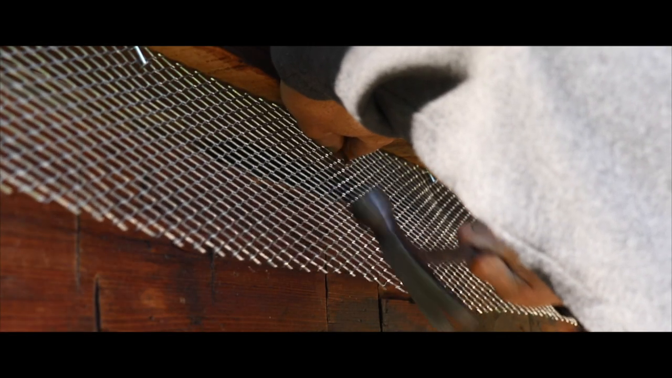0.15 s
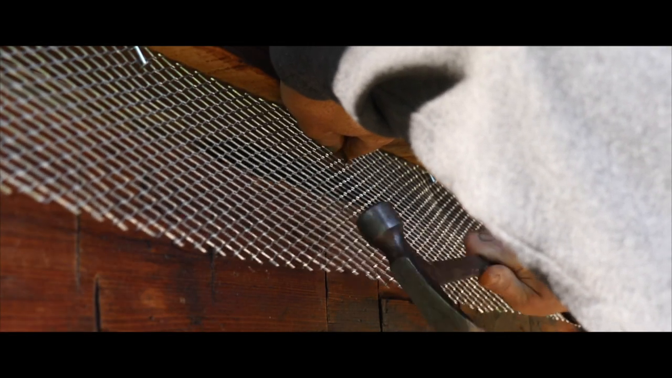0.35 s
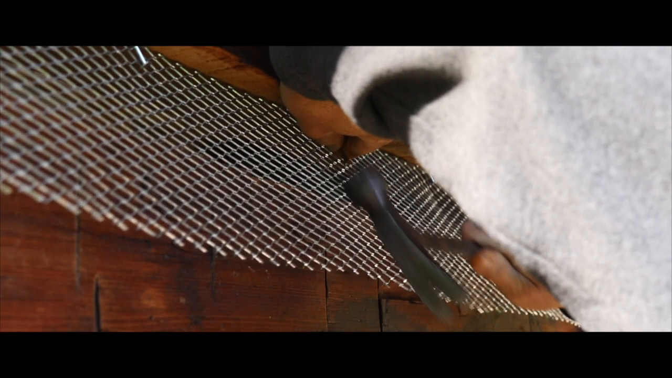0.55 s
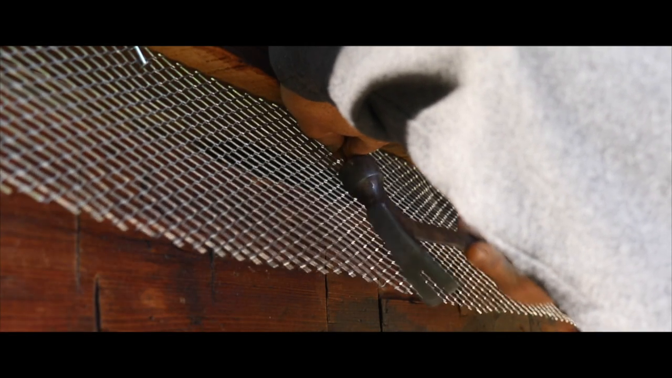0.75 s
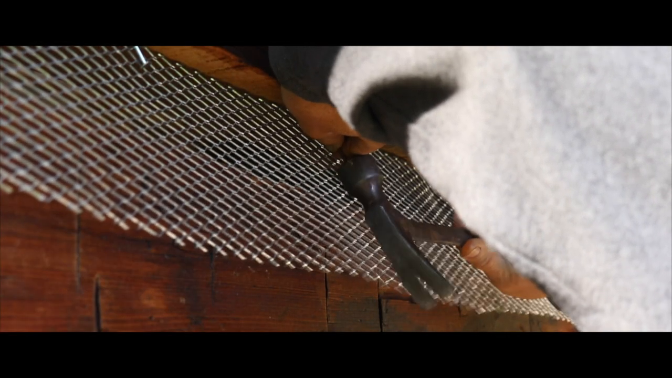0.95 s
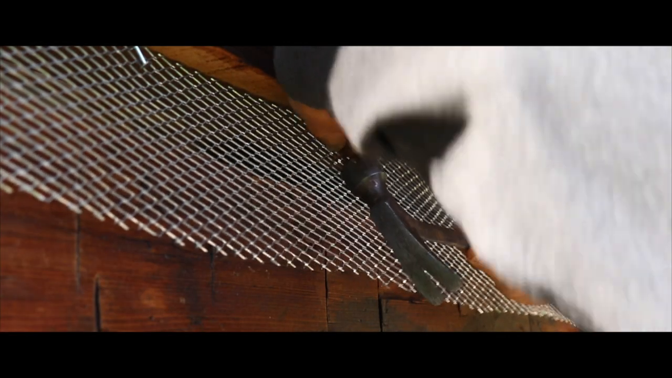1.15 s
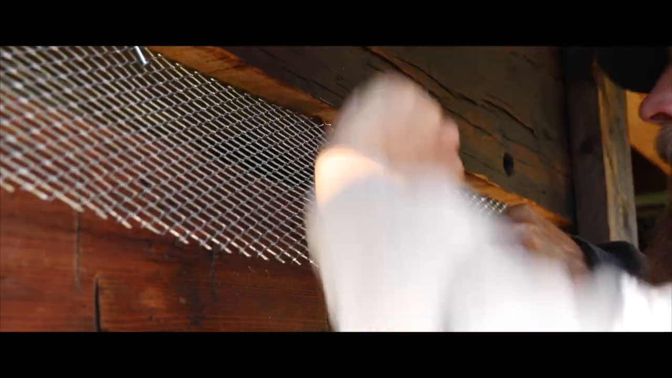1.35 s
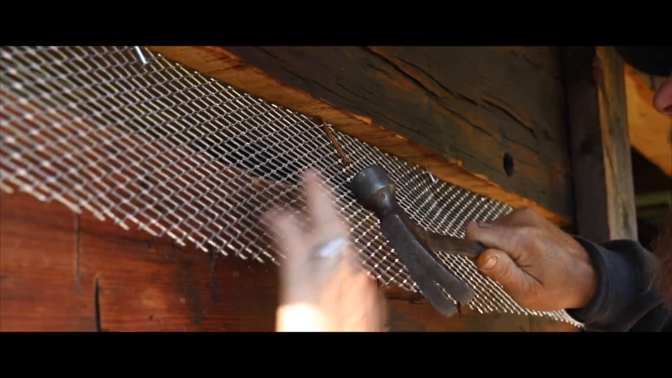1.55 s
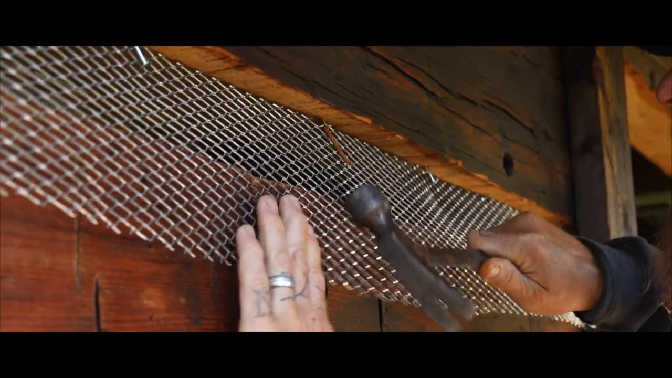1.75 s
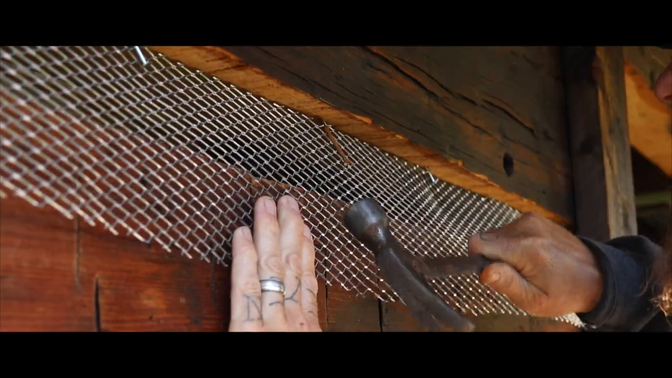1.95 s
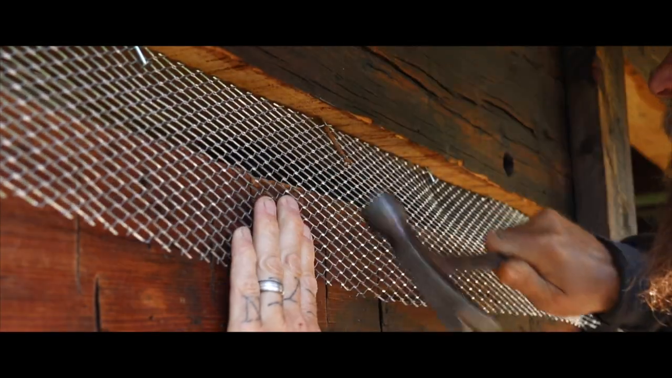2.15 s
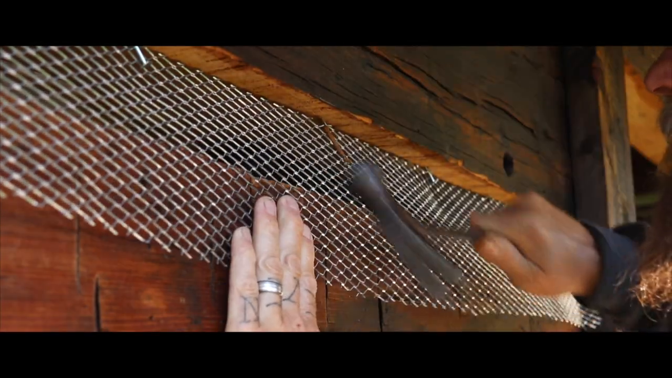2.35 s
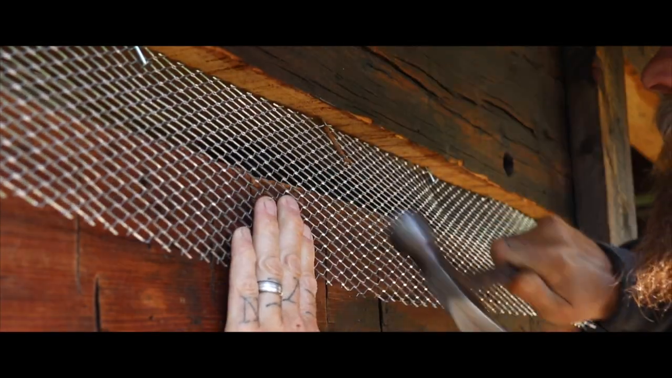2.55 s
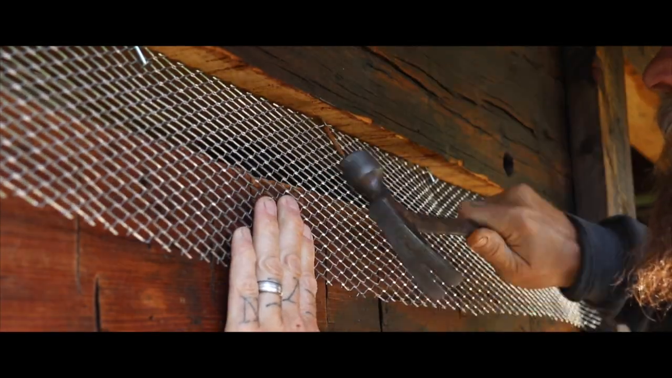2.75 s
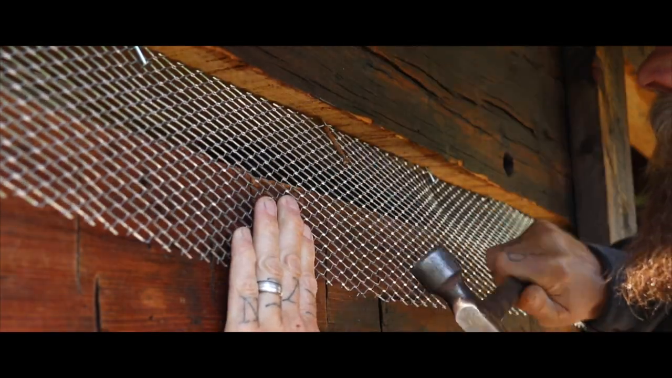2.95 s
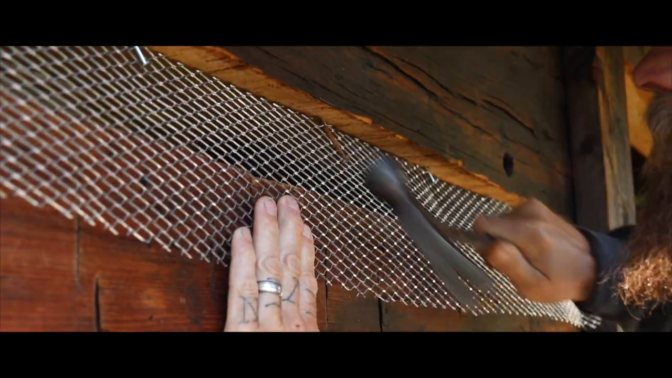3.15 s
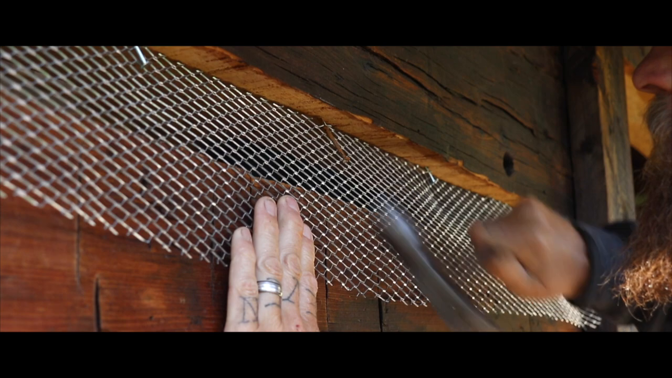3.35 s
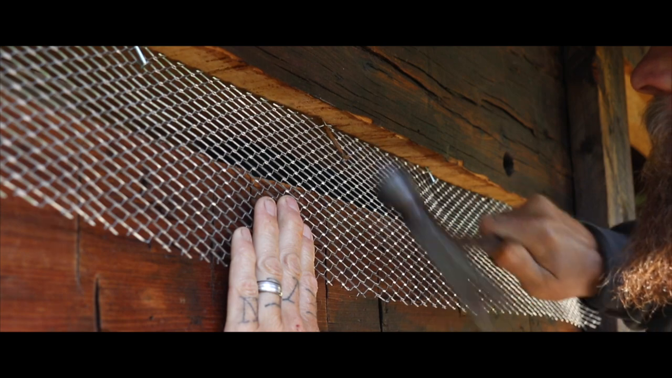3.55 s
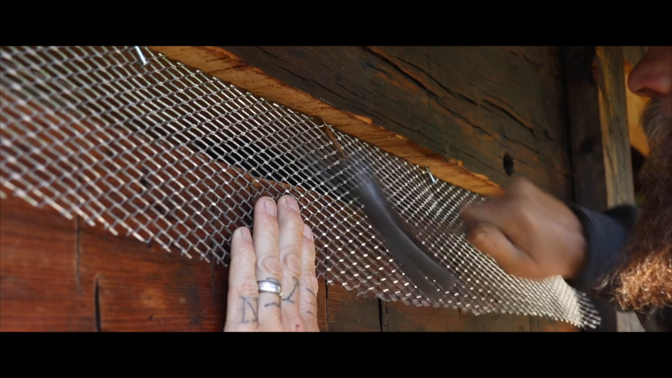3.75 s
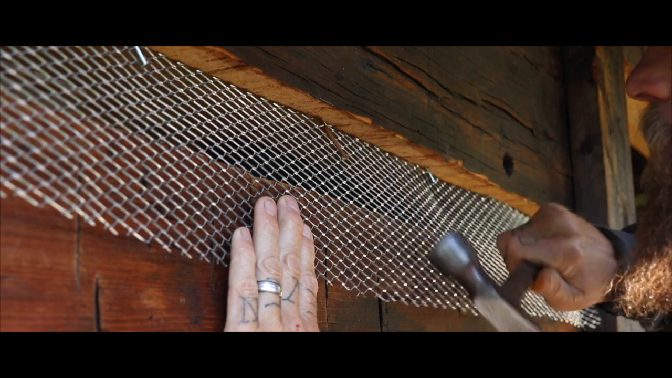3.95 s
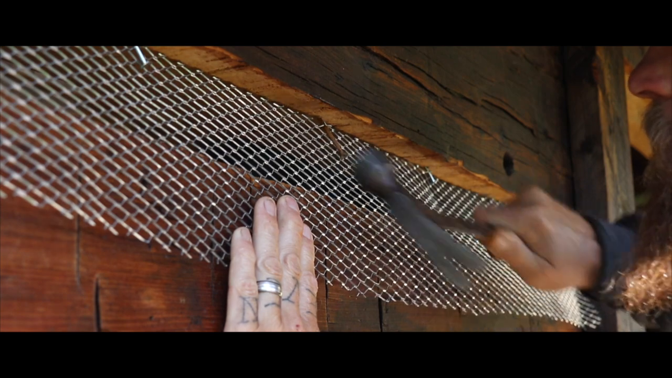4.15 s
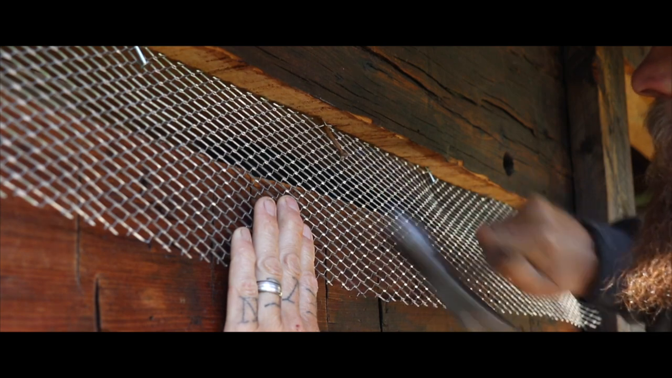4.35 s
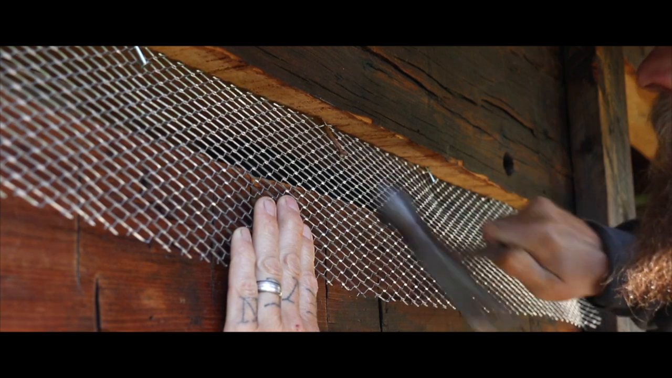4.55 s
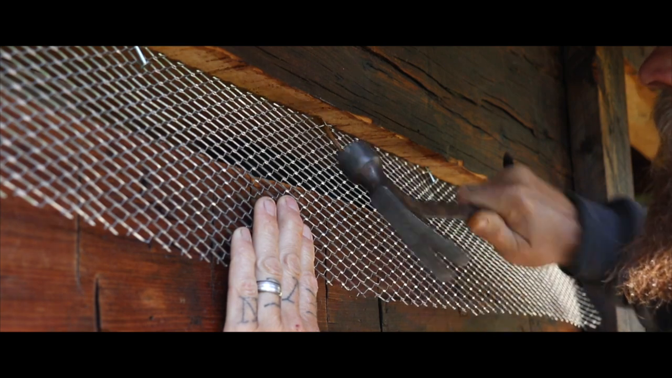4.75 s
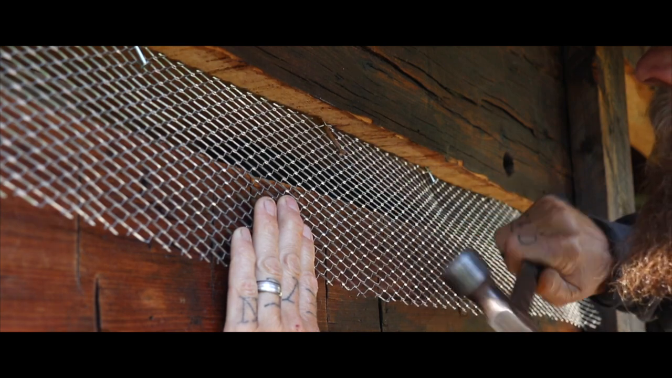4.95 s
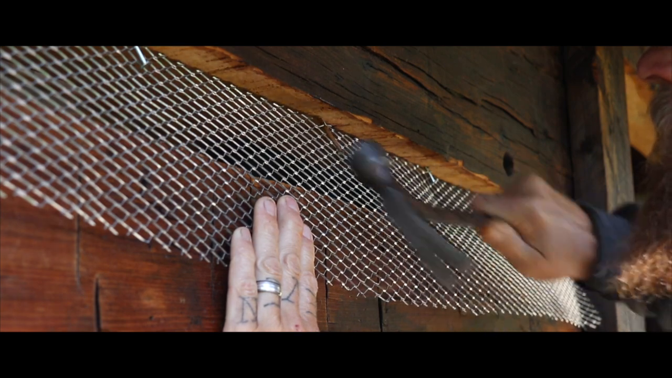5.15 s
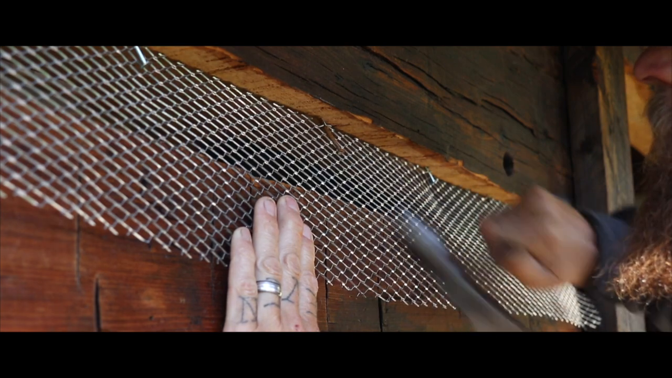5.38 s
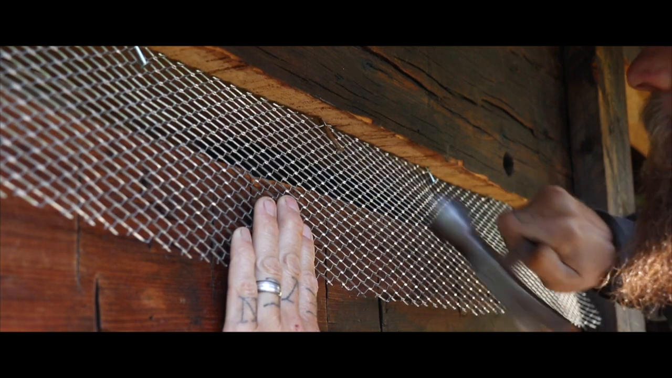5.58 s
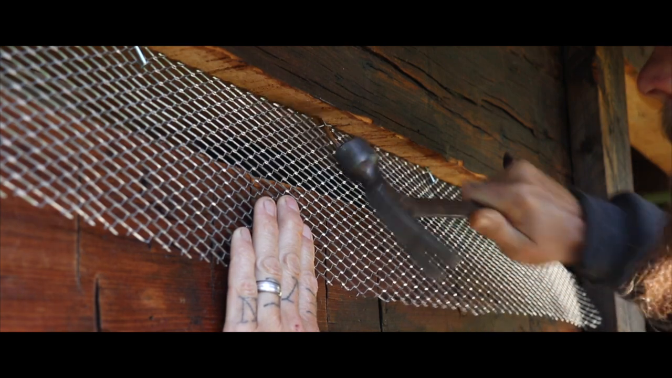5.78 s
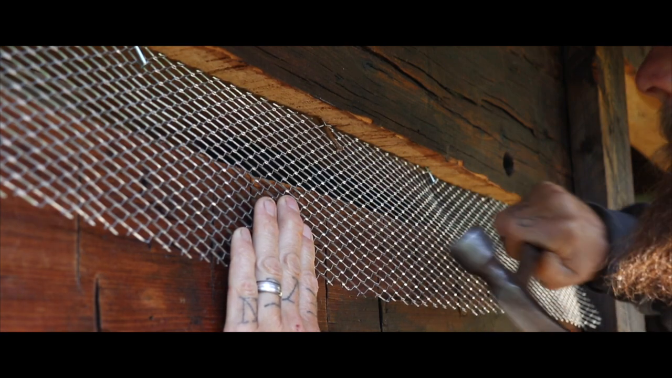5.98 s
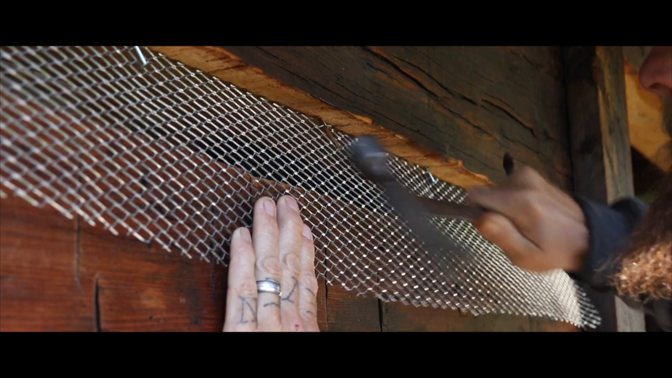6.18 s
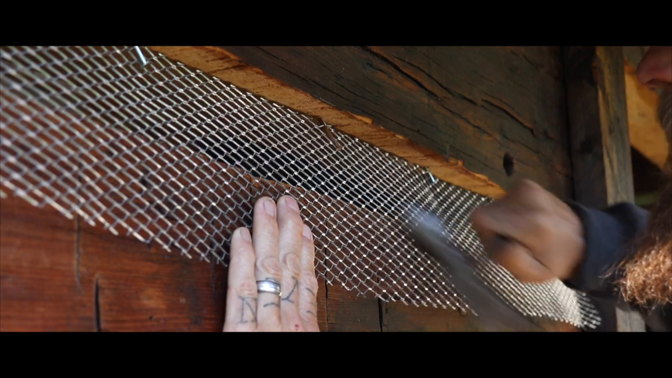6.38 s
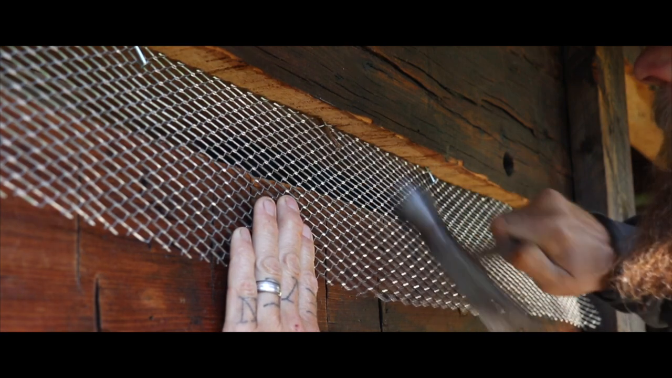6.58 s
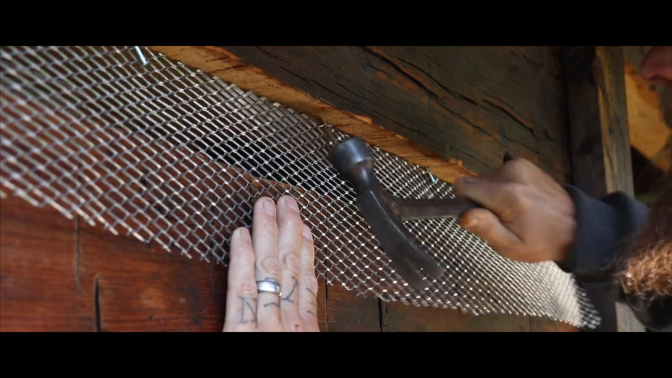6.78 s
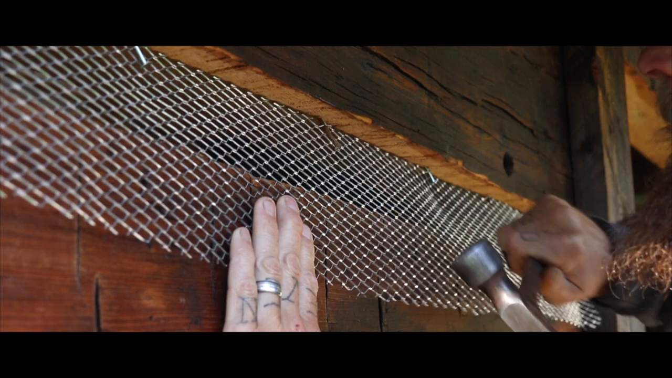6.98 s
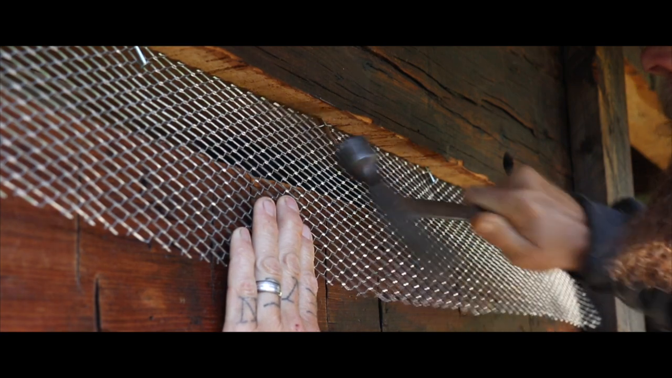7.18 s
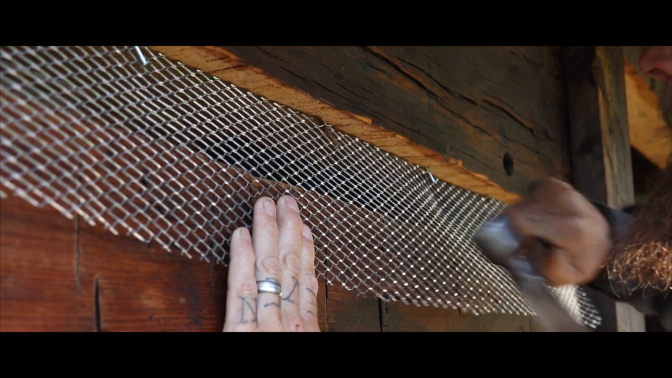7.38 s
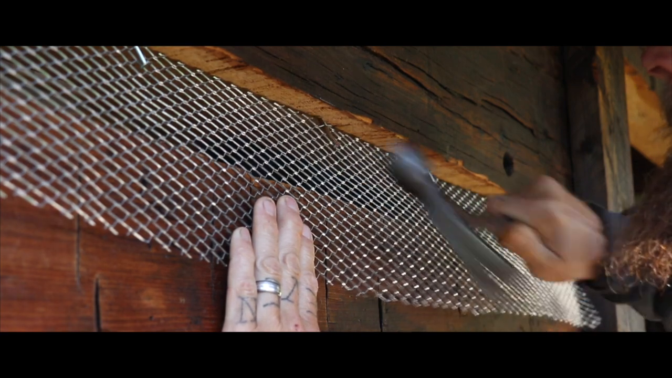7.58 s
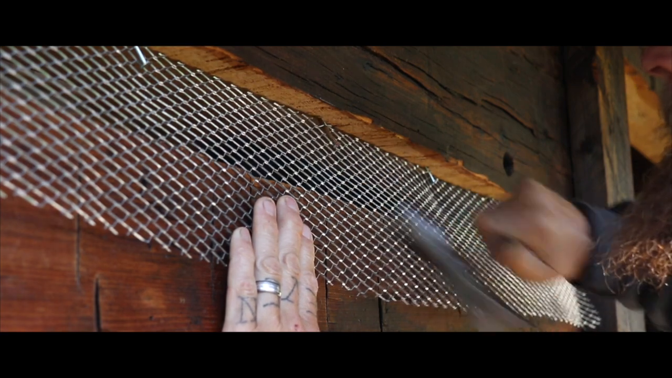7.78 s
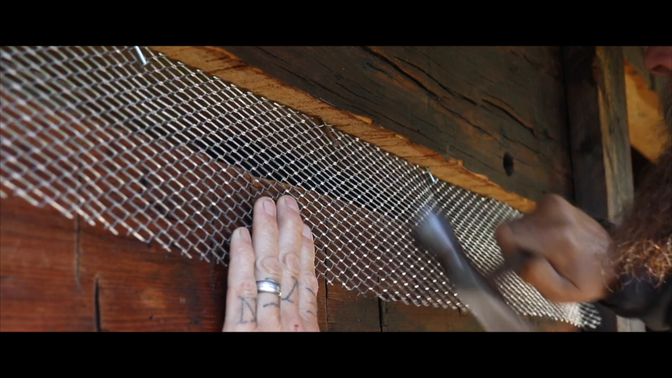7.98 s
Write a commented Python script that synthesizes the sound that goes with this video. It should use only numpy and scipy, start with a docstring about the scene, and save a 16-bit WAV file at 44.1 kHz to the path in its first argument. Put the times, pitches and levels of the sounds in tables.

```python
"""A claw hammer taps, then drives a nail through wire mesh into a plank wall, close to an input that overloads.
Planks and nail are sums of dying sines; the mesh is banded noise that clanks, rattles and slaps back on the wood.
The head sings on the last blows: two moving paths of one tone beat. Sleeve and hand rustle as coloured noise.
Gliding tones squeak and chirp; a far wall echoes thinly and a diffuse tail lingers.
Under it lie outdoor air, as patchy noise, and faint thin high tones that drift and flicker."""
import sys
import numpy as np
from scipy import signal
from scipy.fft import rfft, irfft, next_fast_len
from scipy.io import wavfile
from scipy.ndimage import uniform_filter1d

SR = 44100
rng = np.random.default_rng(int(sys.argv[2]) if len(sys.argv) > 2 else 0)


def put_to_file(sound):
    """Save the sound as 16-bit audio at rate SR, in the file named by the first command-line argument."""
    columns = np.atleast_2d(sound).T  # one column per channel
    safe = np.clip(columns, -1, 1)
    whole_steps = np.round(safe * 32767)
    wavfile.write(sys.argv[1], SR, whole_steps.astype(np.int16))


N = 353682

# hammer blows, each with the mesh slapping back, relative levels: (time [s], clank [dB], brightness [dB/octave],
# woody knock [dB], slap delay [s], slap knock [dB], slap tick [dB])
HAMMER_BLOWS = [(0.0034, -22.5, 0.5, -27, .03, -25, -65), (0.2445, -22, 2, -23.5, .033, -28, -62),
                (0.4901, -19.5, 0.1, -26, .0286, -17, -42), (0.7331, -21, 3.5, -16.5, .0306, -16, -38),
                (0.9747, -20, 2, -16, .0266, -18, -39), (2.0719, -20.5, 4, -17, .036, -13, -34),
                (2.4257, -14, 0.1, -18, .038, -15.5, -36), (2.7729, -10.5, 0, -17, .0315, -9.5, -33),
                (3.1128, -9.5, -0.5, -14.5, .0439, -14, -34.5), (3.454, -7, 2, -14.5, .027, -9, -59),
                (3.8015, -7, 0.9, -13.5, .0401, -9.5, -30.5), (4.1271, -6, 1.5, -12, .0309, -5.5, -29.5),
                (4.46, -4.5, 1.3, -11, .0233, -3.5, -30), (4.7881, -4.5, -0.5, -12.5, .0254, -3.5, -32.5),
                (5.1284, -4, 3.5, -13, .024, -2.5, -49), (5.463, -3, 1.5, -11.5, .0308, -7.5, -38.5),
                (5.7889, -2.5, -0.7, -11, .0314, -1.7, -26.5), (6.1288, 0, 2.5, -12, .0321, -4, -41),
                (6.4688, -2, 2.5, -10, .0331, -1.9, -32.5), (6.8066, -0.3, 4, -9.5, .0302, -3.5, -28),
                (7.1463, 0.4, 2.5, -10, .0327, -18.5, -39), (7.5086, 1, 3, -7, .0227, -12.5, -37),
                (7.8817, 1, 3, -6.5, .037, 0.5, -27)]
# plank modes: (frequency [Hz], relative level [dB], t60 [s], direction of first swing [+1/-1])
PLANK_MODES = [(98.6, -35.5, 1, -1), (115.77, -20.5, 0.55, 1), (142.4, -15.5, 0.6, 1),
               (145, -5.5, 0.19, -1), (158.4, -29, 0.8, -1), (227, -31.5, 0.8, -1),
               (232.1, -14.5, 0.27, -1), (256, -29, 0.15, -1), (304.75, 3, 0.14, 1),
               (305.35, 4.5, 0.097, -1), (326.26, -0.53, 0.19, 1), (333.1, -7.5, 0.14, -1),
               (353.5, -13, 0.26, 1), (439, -19, 0.2, -1), (432, -12, 0.054, 1), (491, -29, 0.36, 1),
               (513.7, -21, 0.14, 1), (606, -26.5, 0.19, 1), (676, -15.5, 0.039, 1), (874, -13.5, 0.031, 1),
               (816, -18.5, 0.045, 1), (956.6, -12.5, 0.052, 1), (1108, -20, 0.076, 1)]


def amp(db):
    """Decibels to amplitude."""
    return 10 ** (np.asarray(db) / 20)


def evened(x):
    """Scales to unit RMS."""
    return x / np.sqrt(np.mean(x ** 2) + 1e-20)


def train(time_s, size):
    """Single-sample clicks of the given sizes."""
    out = np.zeros(N)
    index = np.clip(np.round(time_s * SR).astype(int), 0, N - 1)
    np.add.at(out, index, size)
    return out


def ring(modes, length_s):
    """Impulse response of a resonant body: a sum of dying sines."""
    t = np.arange(round(length_s * SR)) / SR
    out = np.zeros(len(t))
    for hz, db, t60_s, *way in modes:
        sign = np.sign(way[0]) if way else 1
        out += sign * amp(db - 60 * t / t60_s) * np.sin(2 * np.pi * hz * t)
    return out


def fade(clicks, t60_s):
    """Power that jumps at each click and dies exponentially."""
    return signal.lfilter([1], [1, -amp(-120 / (t60_s * SR))], clicks)


def coloured(points, patchy_db, size):
    """Unit-RMS noise with a set spectrum and patches that drift over time and frequency."""
    hz = np.fft.rfftfreq(size, 1 / SR)
    f, db = np.transpose(points)
    real, imag, patches = rng.standard_normal((4 * N // size + 5, len(hz), 3)).T
    patches = uniform_filter1d(patches, size=size // 64, axis=0)  # across frequency
    patches = evened(uniform_filter1d(patches, size=6144 // size, axis=1))  # across time
    level_db = np.interp(np.log(hz + 1), np.log(f + 1), db)[:, None] + patchy_db * patches
    z = (real + 1j * imag) * amp(level_db)
    return evened(signal.istft(z, nperseg=size, noverlap=size * 3 // 4)[1][:N])


def whistle(rows, overtones_db, wobble, taper):
    """Short gliding tones with soft ends; overtones swell towards the middle."""
    out = np.zeros(N)
    for start_s, length_s, first_hz, last_hz, db in rows:
        u = np.linspace(0, 1, round(length_s * SR))
        drift = uniform_filter1d(rng.standard_normal(4 * SR // 10), size=200)
        drift = 1 + wobble * evened(drift)[:len(u)]
        phase = 2 * np.pi * np.cumsum((first_hz + (last_hz - first_hz) * u) * drift) / SR
        tone = np.zeros(len(u))
        for k, overtone_db in enumerate(overtones_db):
            tone += amp(overtone_db) * np.sin((k + 1) * phase) * np.sin(np.pi * u) ** (2 * k)
        tone *= np.sqrt(2) * amp(db) * signal.windows.tukey(len(u), taper)
        out[round(start_s * SR):][:len(u)] += tone
    return out


def tinted(x):
    """Passes a sound through the lasting colour of mesh on wood."""
    # peaks and hollows: (frequency [Hz], width [Hz], level [dB])
    peaks = [(380, 25, -4.5), (454, 25, 8), (525, 11, 6.5), (661, 31, 5), (790, 22, -1.5), (932, 67, 5),
             (1034, 20, -4.5), (1330, 99, -1.5), (1948, 120, 8), (2208, 56, -9), (2277, 140, 9.5),
             (2680, 41, 3), (2970, 30, -0.5), (3680, 170, 3), (4336, 180, 5.5), (4970, 280, 4.5),
             (10800, 1400, 3.5), (10600, 210, 2.5)]
    size = next_fast_len(N)
    hz = np.fft.rfftfreq(size, 1 / SR)
    gain_db = sum(db / (1 + (2 * (hz - f) / width_hz) ** 2) for f, width_hz, db in peaks)
    return irfft(rfft(x, size) * amp(gain_db))[:N]


def thud(clank_db):
    """Thud level [dB]: grows more slowly than the clank."""
    return -10.5 + 0.3 * clank_db


def outdoor_air():
    """Steady coloured noise with drifting patches."""
    # spectrum: (frequency [Hz], relative level [dB per Hz])
    spectrum = [(15, -38), (25, -3.5), (70, 7.5), (262, -1), (325, 3), (542, -4.5), (906, -7),
                (2600, -19.5), (3050, -18.5), (6500, -27), (7050, -24.5), (15800, -40)]
    return amp(-55) * coloured(spectrum, patchy_db=2.2, size=2048)


def thin_tones():
    """Faint thin high tones, spaced at multiples of a gliding pitch, drifting and flickering."""
    # glide: (time [s], base pitch [Hz], relative level [dB])
    glide = [(0, 184, 9), (2.002, 178.4, 0.5), (3.701, 175.6, 4), (5, 171, 4), (5.6, 175.7, 0),
             (8.02, 179, -10.5)]
    # tones: (multiple of base pitch, relative level [dB])
    tones = [(35, -82), (37, -88), (39, -81), (41, -87), (43, -85), (44, -88), (46, -85)]
    t = np.arange(N) / SR
    time_s, base_hz, level_db = np.transpose(glide)
    phase = 2 * np.pi * np.cumsum(np.interp(t, time_s, base_hz)) / SR
    out = np.zeros(N)
    for multiple, db in tones:
        rate_hz, start = 0.08 + rng.random(), rng.random()
        flicker_db = 4.4 * np.sin(2 * np.pi * (rate_hz * t + start))
        out += amp(db + flicker_db) * np.sin(multiple * phase)
    return out * amp(np.interp(t, time_s, level_db))


def yard(x):
    """Long faint diffuse tail from the surroundings: fresh noise follows the dying energy."""
    band = signal.butter(4, [500, 4600], "bandpass", fs=SR, output="sos")
    energy = fade(signal.sosfilt(band, x) ** 2, 0.58) / SR
    noise = evened(signal.sosfilt(band, tinted(rng.standard_normal(N))))
    return amp(-13.0) * np.sqrt(energy) * noise


def far_wall(x):
    """One thin, smeared echo of the metal a quarter second late."""
    t = np.arange(1500) / SR
    smear = evened(rng.standard_normal(1500) * amp(-60 * t / 0.05)) / np.sqrt(1500)  # unit energy
    late = np.r_[np.zeros(round(0.256 * SR)), signal.oaconvolve(x, smear)][:N]
    band = signal.butter(3, [2700, 5600], "bandpass", fs=SR, output="sos")
    return amp(-46.5) * signal.sosfilt(band, late)


def chirps():
    """A bird: short gliding pure tones."""
    # (start [s], length [s], first pitch [Hz], last pitch [Hz], level [dB])
    notes = [(1.28, 0.043, 3550, 3680, -71), (1.64, 0.041, 3800, 3680, -62), (2.392, 0.02, 3960, 3850, -63),
             (3.772, 0.037, 3850, 3680, -54)]
    return whistle(notes, [0], wobble=0.011, taper=0.73)


def squeaks():
    """Falling squeaks with two overtones."""
    # (start [s], length [s], first pitch [Hz], last pitch [Hz], level [dB])
    glides = [(1.328, 0.129, 956, 905, -51), (1.445, 0.051, 830, 815, -53.5)]
    return whistle(glides, [0, -12, -13], wobble=0.019, taper=0.41)


def rustle():
    """Sleeve and hand rub the mesh: noise strokes swell to a top and fade."""
    # hand strokes: (time of top [s], relative level [dB], rise per 20 dB [s], fall per 20 dB [s])
    strokes = [(1.4, -62, 0.074, 0.11), (1.57, -58, 0.22, 0.25), (1.7, -62.5, 0.13, 0.13),
               (1.8, -54, .02, 0.13), (1.85, -51.5, 0.08, 0.098), (2.07, -32, 0.042, 0.027)]
    # cloth spectrum: (frequency [Hz], relative level [dB per Hz])
    spectrum = [(240, -39), (400, -5), (459, -14), (1040, -9), (1210, -6.5), (1390, -5.5), (2420, -20.5),
                (3000, -15), (3900, -20.5), (4920, -19), (5820, -21), (10900, -34.5), (15800, -48)]
    taps = HAMMER_BLOWS[:5]
    # the sleeve rubs at each light tap and again halfway to the next, levels follow the clank
    rubs = [(tap[0], tap[1] - 13.5, 0.07, 0.076) for tap in taps]
    rubs += [((a[0] + b[0]) / 2, a[1] - 20.5, 0.15, 0.086) for a, b in zip(taps, taps[1:])]
    power = np.zeros(N)
    for top_s, db, rise_s, fall_s in rubs + strokes:
        t = np.arange(round(2.5 * SR)) / SR - top_s
        slope_db = 20 * np.where(t < 0, t / rise_s, -t / fall_s)
        power[:len(t)] += amp(db + slope_db) ** 2
    catch_db = 0.59 * evened(uniform_filter1d(rng.standard_normal(N), size=200))  # fibres catch on the wires
    power *= amp(catch_db) ** 2
    return coloured(spectrum, patchy_db=1.2, size=512) * np.sqrt(power)


def wall_murmur(brush):
    """Brushing excites the plank modes faintly."""
    return amp(-31.5) * signal.oaconvolve(brush, ring(PLANK_MODES, 0.3))[:N]


def slaps():
    """Mesh springs back: a dull inward knock of about a millisecond wakes the upper plank modes."""
    blow_s, *_, delay_s, knock_db, _ = np.transpose(HAMMER_BLOWS)
    slap_s = blow_s + delay_s
    t = np.arange(-130, 400) / SR
    envelope = np.exp(-np.where(t < 0, -t / 0.00029, t / 0.0013))
    knock = -np.cos(2 * np.pi * 650 * t) * envelope
    upper = ring([mode for mode in PLANK_MODES if mode[0] > 400], 0.3)
    knocks = signal.oaconvolve(train(slap_s + t[0], amp(knock_db)), knock)[:N]
    return knocks - signal.oaconvolve(train(slap_s, amp(knock_db - 5)), upper)[:N]


def planks():
    """Each blow sets the same wall modes booming."""
    blow_s, clank_db = np.transpose(HAMMER_BLOWS)[:2]
    clicks = train(blow_s, amp(thud(clank_db) + 9.5))
    return signal.oaconvolve(clicks, ring(PLANK_MODES, 0.9))[:N]


def wire_noise(blow_s):
    """Shiver of the wires: partly fresh, partly one pattern restarted at each blow."""
    alike = 0.5  # 0-1, likeness from blow to blow
    starts = np.r_[0, np.round(blow_s * SR).astype(int)]
    n = np.arange(N)
    since_blow = n - starts[np.searchsorted(starts, n, "right") - 1]
    fresh, habit = tinted(rng.standard_normal(N)), tinted(rng.standard_normal(N))
    return np.sqrt(1 - alike ** 2) * fresh + alike * habit[since_blow]


def mesh():
    """Many wires: crack and longer rattle per noise band; treble dies first, bass blooms late."""
    # bands: (centre [Hz], relative crack level [dB], crack t60 [s], relative rattle level [dB], rattle t60 [s])
    bands = [(48, -37, 0.03, -47.5, 1.1), (97.2, -28.5, 0.033, -27, 1.6), (208, -30.5, 0.092, -18, 0.63),
             (443, -8, 0.016, -22.5, 0.39), (823, -21.5, 0.027, -28, 0.36), (1700, -7, 0.054, -20.5, 0.18),
             (2440, -5.5, 0.033, -24, 0.22), (3760, -12.5, 0.12, -17.5, 0.099), (6540, -14, .04, -33, 0.15),
             (7650, -20.5, 0.017, -33, 0.14), (11500, -23, 0.028, -39, 0.055),
             (13520, -34.5, 0.0062, -39.5, 0.073), (15900, -35, .012, -42.5, .07)]
    blow_s, clank_db, bright_db, knock_db, delay_s, slap_db, tick_db = np.transpose(HAMMER_BLOWS)
    size = next_fast_len(N)
    z = rfft(wire_noise(blow_s), size)
    log_hz = np.log(np.fft.rfftfreq(size, 1 / SR) + 1)
    centres = np.log([row[0] for row in bands])
    chatter = amp(evened(uniform_filter1d(rng.standard_normal(N), size=90)))  # 1 dB RMS
    out = np.zeros(N)
    for k, (f, crack_db, crack_s, rattle_db, rattle_s) in enumerate(bands):
        share = np.interp(log_hz, centres, np.arange(len(bands)) == k, right=0)  # power, overlapping triangles
        band = evened(irfft(z * np.sqrt(share))[:N])
        if f < 300:  # thud
            blow_db, again_db, again_s = thud(clank_db) + 4.5, slap_db - 33, 0.1
        elif f < 1200:  # woody knock
            blow_db, again_db, again_s = knock_db + 10.0, slap_db - 6.5, 0.13
        else:  # clank
            blow_db, again_db, again_s = clank_db + bright_db * np.log2(f / 3000), tick_db + 4.0, 0.08
        drive = train(blow_s, amp(blow_db) ** 2)
        slap_drive = train(blow_s + delay_s, amp(again_db) ** 2)
        power = (fade(drive, crack_s) + fade(slap_drive, again_s)) * amp(crack_db) ** 2
        power += fade(drive, rattle_s) * amp(rattle_db) ** 2
        lag = np.exp(-f / (1.5 * SR))  # a band needs a cycle or two to build up
        envelope = np.sqrt(abs(signal.lfilter([1 - lag], [1, -lag], power)))
        out += band * envelope * (chatter if f > 1200 else 1)
    return out


def song():
    """One thin head mode beats: the direct path grows with the swing, the reflected one shrinks."""
    # last blows: (relative level [dB], swing pace [1 = usual], gap to wall at the blow [m],
    # first share of the reflection [0-1], t60 [s])
    songs = [(-24.5, 1.2, 0.011, 0.3, .15), (-27.5, 1.08, .013, .3, 0.52), (-29.5, 1.01, .010, .55, 0.49),
             (-31.5, .95, .014, .55, 0.36), (-20.5, .97, 0.0095, 0.5, 0.59), (-26.5, 1.04, 0.017, .3, 0.47),
             (-33.5, 1.01, 0.016, .6, .52), (-16, .99, 0.017, .4, 0.53), (-28, .95, 0.015, .55, 0.47),
             (-23, 0.96, 0.016, 0.53, 0.64)]
    # swing at usual pace: (time after blow [s], lift [m])
    swing = [(0, 0), (.18, .098), (.235, .114), (.29, .097), (.322, .089), (.4, .03)]
    head_hz, sound_m_per_s, rise_s = 5445, 343, 0.006
    share_per_s = 1.2  # the reflection gains as the head turns away
    when_s, lift_m = np.transpose(swing)
    starts = [round(row[0] * SR) for row in HAMMER_BLOWS[-len(songs):]]
    ends = starts[1:] + [N]  # the next blow stops it
    out = np.zeros(N)
    for start, end, (db, pace, gap_m, share, t60_s) in zip(starts, ends, songs):
        t = np.arange(end - start) / SR
        lift = uniform_filter1d(np.interp(t * pace, when_s, lift_m), size=900, mode="nearest")
        late_s = (gap_m + lift) / sound_m_per_s
        direct = np.sin(2 * np.pi * head_hz * (t - late_s))
        reflected = np.minimum(share + share_per_s * t, 1) * np.sin(2 * np.pi * head_hz * (t + late_s))
        out[start:end] = amp(db - 60 * t / t60_s) * np.minimum(t / rise_s, 1) * (direct + reflected)
    return out


def nail():
    """Short rings, shared among the modes a little differently at each blow."""
    # modes: (frequency [Hz], relative level [dB], t60 [s])
    modes = [(1500, -4, 0.015), (1940, -19, 0.0067), (1988, -8, 0.017), (2331, 3, 0.036), (3107, -5, 0.035),
             (4013, -1, 0.042), (4180, -11, 0.029), (3900, -8, 0.017), (4540, -2.5, 0.0086),
             (4780, -14.5, 0.0059), (5100, -10, 0.043)]
    blow_s, clank_db = np.transpose(HAMMER_BLOWS)[:2]
    out = np.zeros(N)
    for mode in modes:
        share_db = 0.61 * rng.standard_normal(len(blow_s))
        clicks = train(blow_s, amp(clank_db - 6.5 + share_db))
        out += signal.oaconvolve(clicks, ring([mode], 0.14))[:N]
    return out


def scene():
    """Sums all sources and their reflections, one channel."""
    wires, brush = mesh(), tinted(rustle())
    metal = nail() + wires + song()
    surroundings = outdoor_air() + thin_tones() + yard(wires) + far_wall(metal)
    small = chirps() + squeaks() + brush + wall_murmur(brush)
    return (surroundings + small + slaps() + planks() + metal)[None]


def record(dry):
    """The input clips on overload, then a low-pass limits the band."""
    low_pass = signal.firwin(511, 15900, window=("kaiser", 9), fs=SR)  # cutoff in Hz
    return signal.oaconvolve(np.clip(dry, -0.99, 0.99), low_pass[None], "same")


dry = scene()
out = record(dry)
put_to_file(out)
```